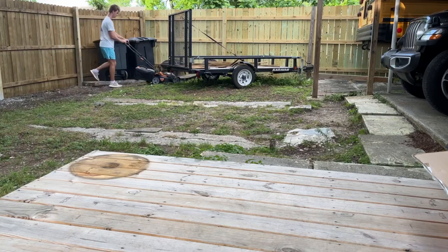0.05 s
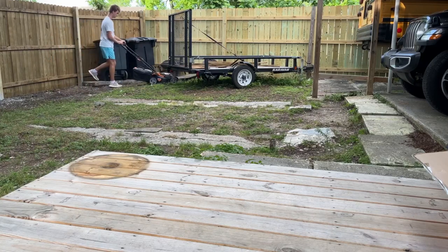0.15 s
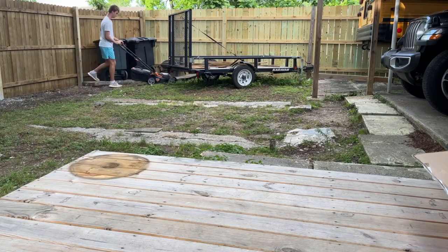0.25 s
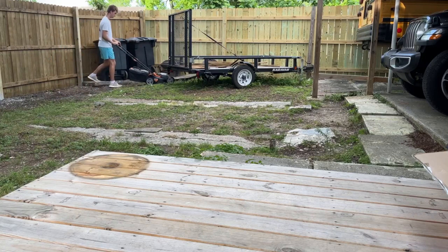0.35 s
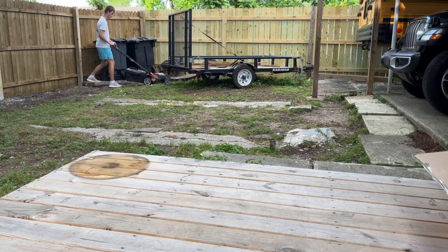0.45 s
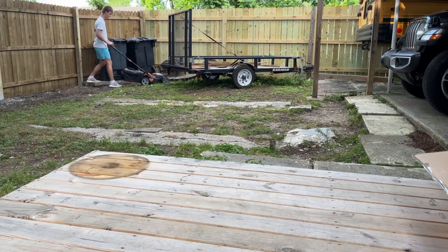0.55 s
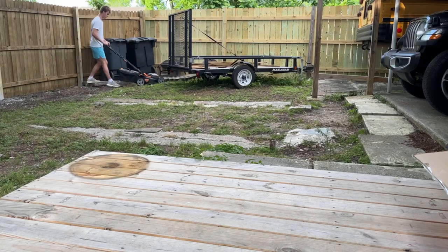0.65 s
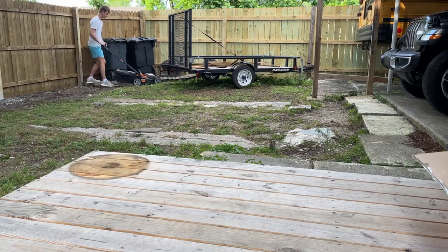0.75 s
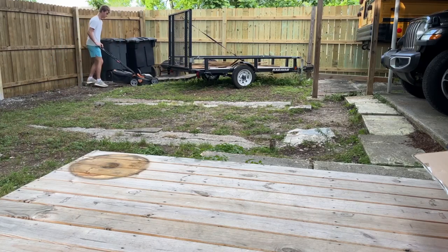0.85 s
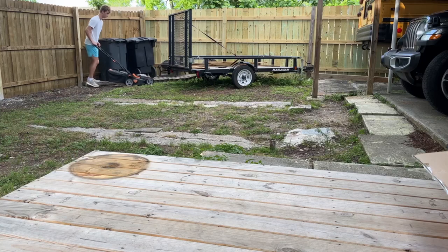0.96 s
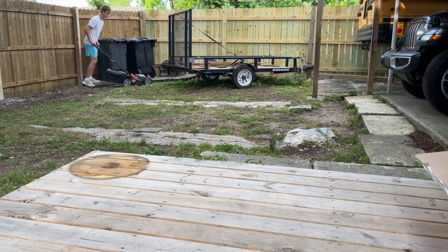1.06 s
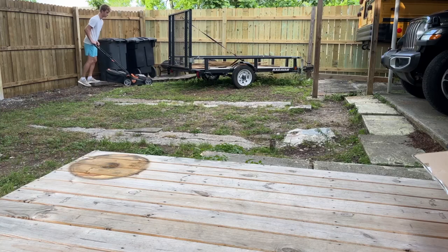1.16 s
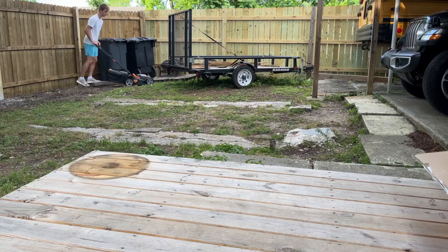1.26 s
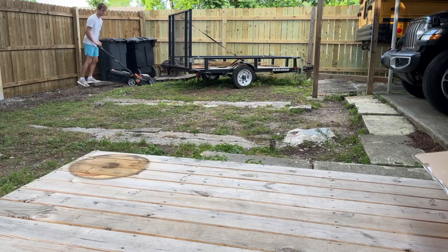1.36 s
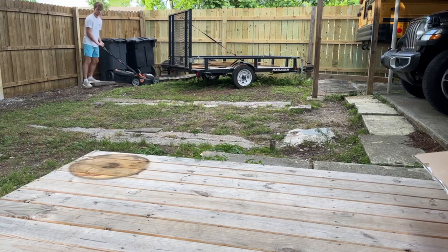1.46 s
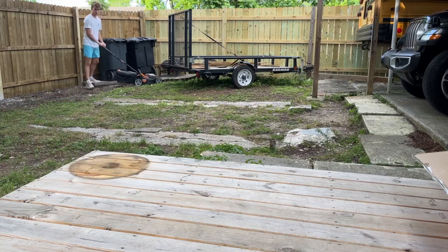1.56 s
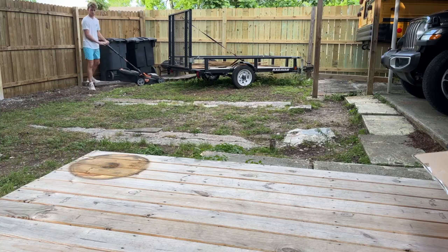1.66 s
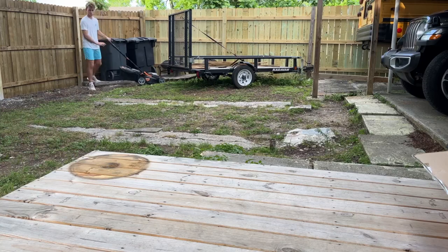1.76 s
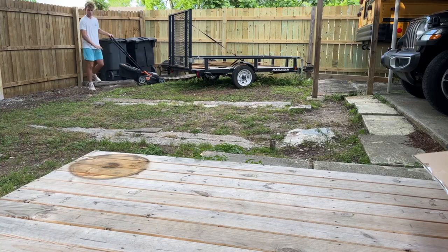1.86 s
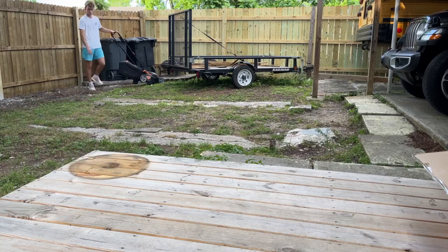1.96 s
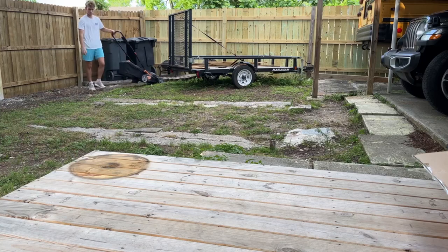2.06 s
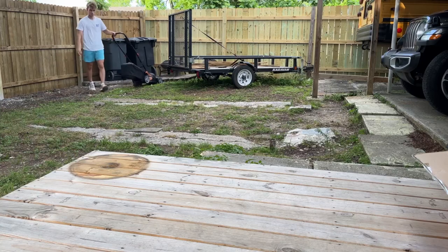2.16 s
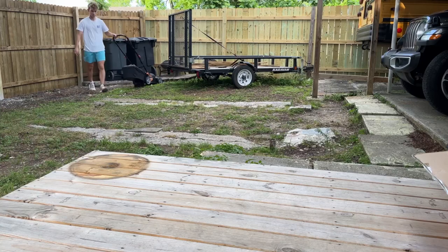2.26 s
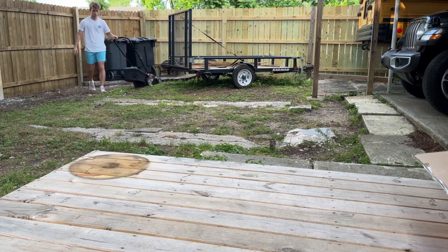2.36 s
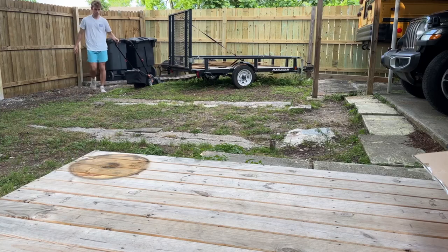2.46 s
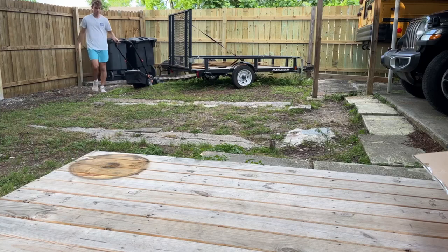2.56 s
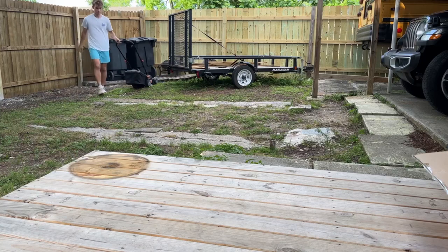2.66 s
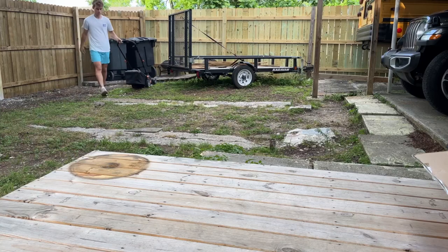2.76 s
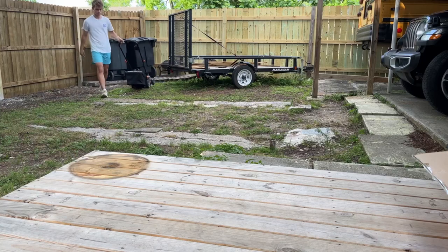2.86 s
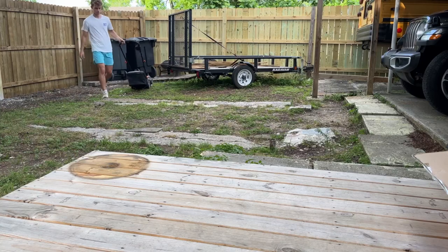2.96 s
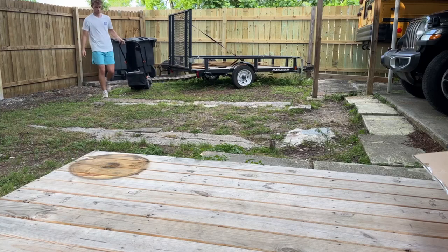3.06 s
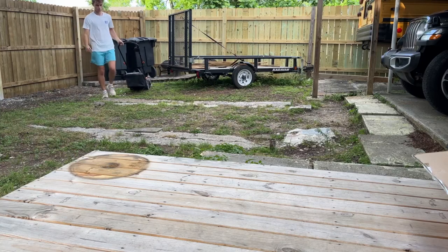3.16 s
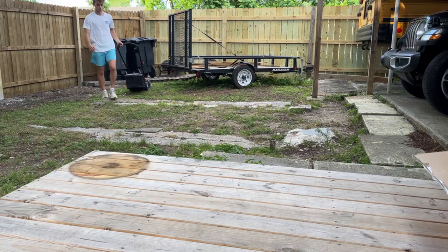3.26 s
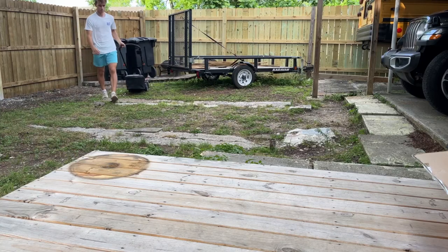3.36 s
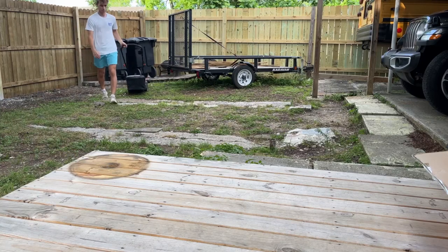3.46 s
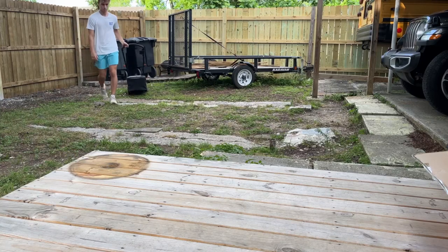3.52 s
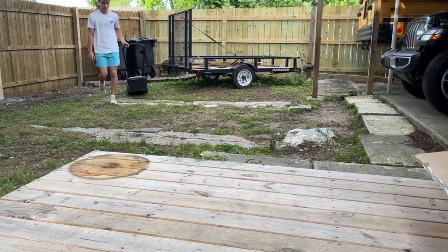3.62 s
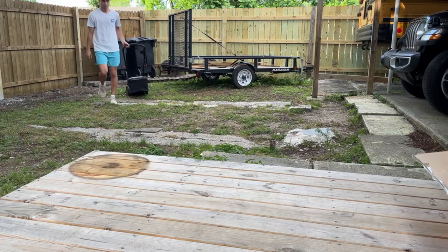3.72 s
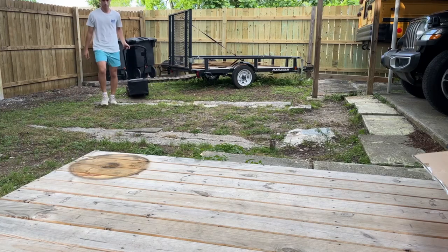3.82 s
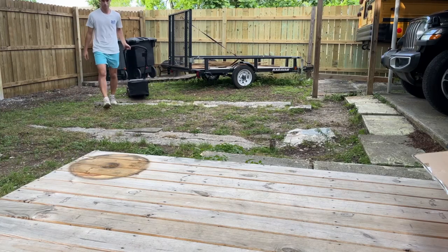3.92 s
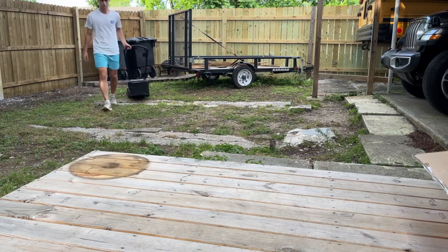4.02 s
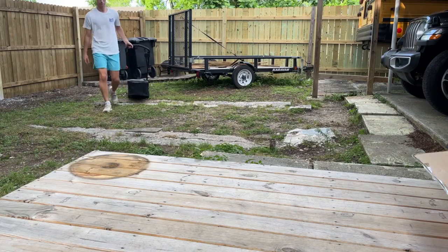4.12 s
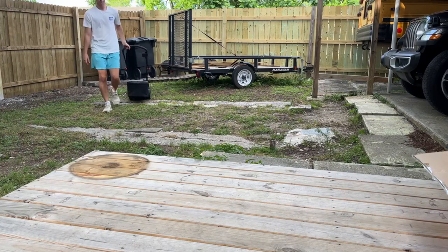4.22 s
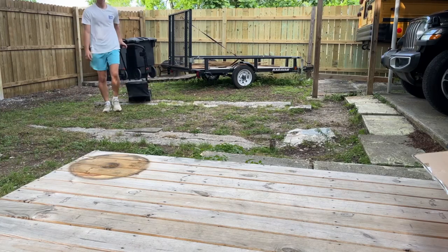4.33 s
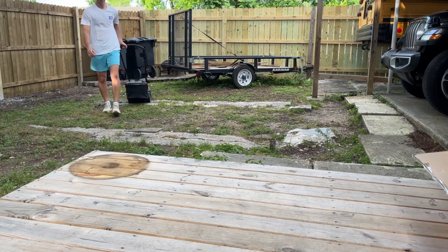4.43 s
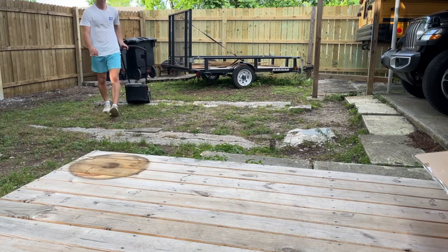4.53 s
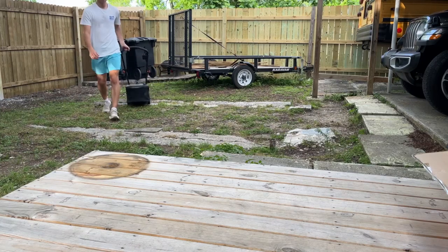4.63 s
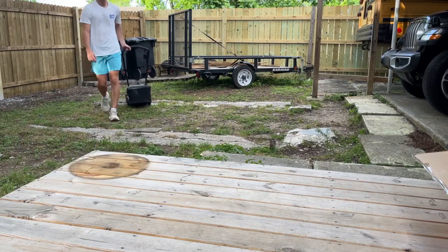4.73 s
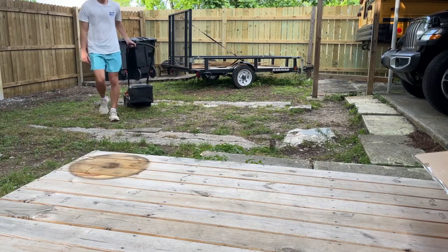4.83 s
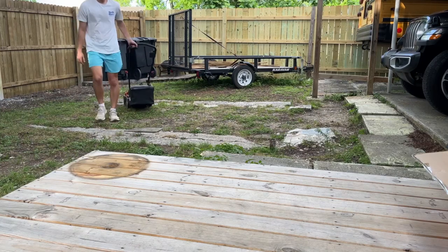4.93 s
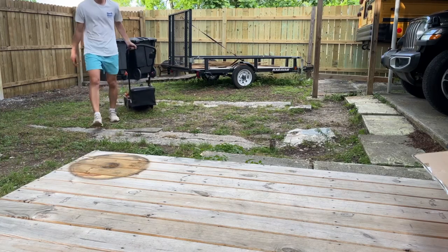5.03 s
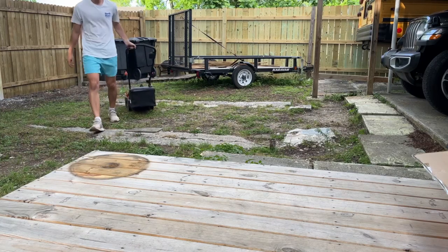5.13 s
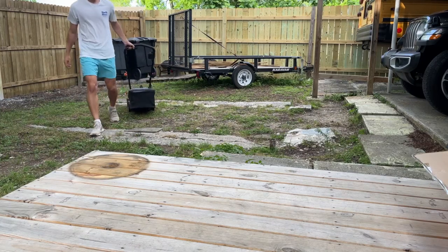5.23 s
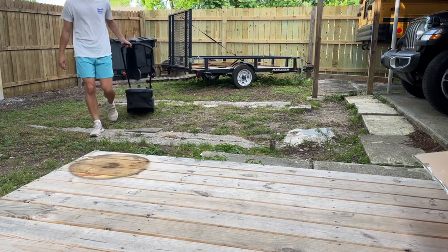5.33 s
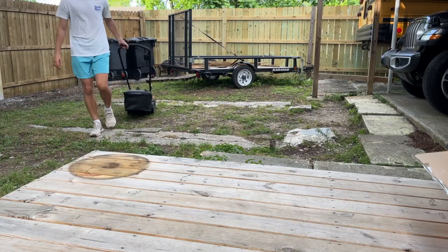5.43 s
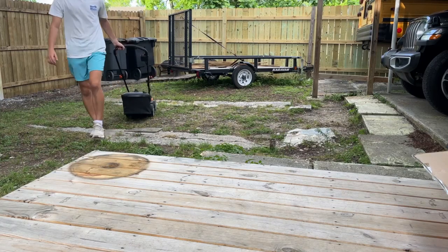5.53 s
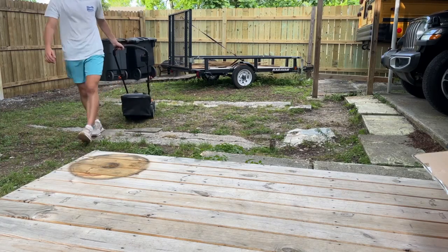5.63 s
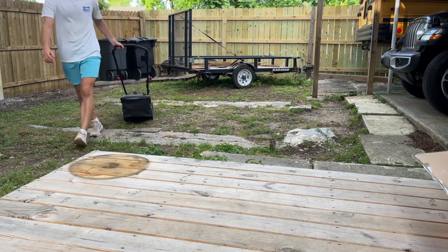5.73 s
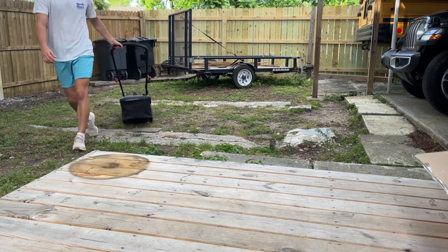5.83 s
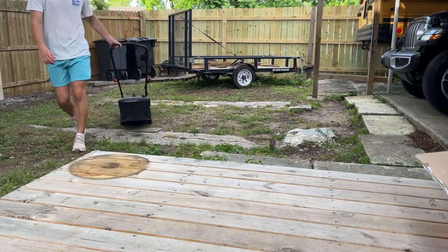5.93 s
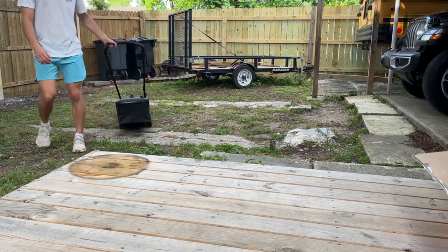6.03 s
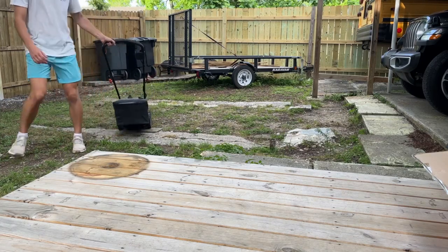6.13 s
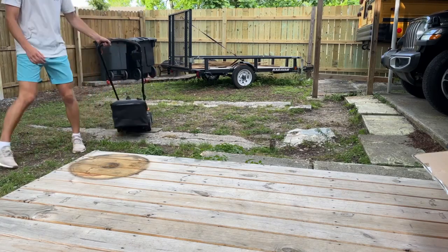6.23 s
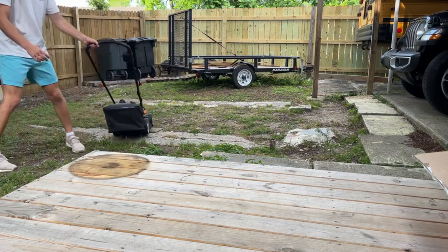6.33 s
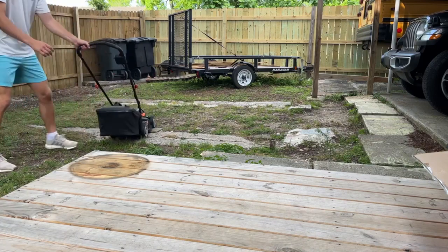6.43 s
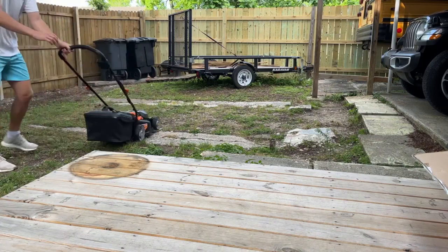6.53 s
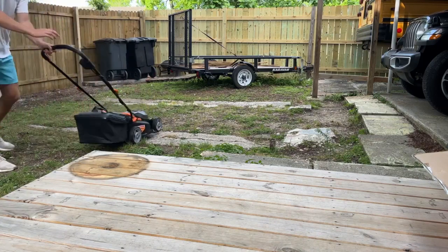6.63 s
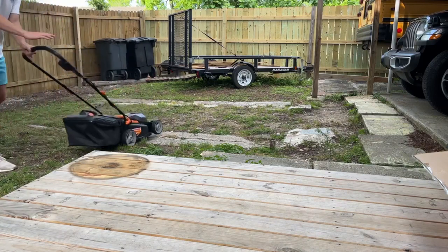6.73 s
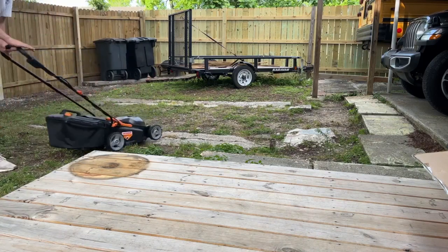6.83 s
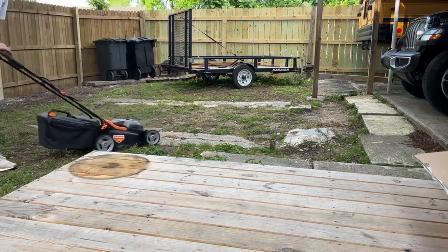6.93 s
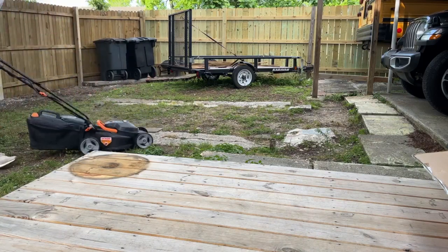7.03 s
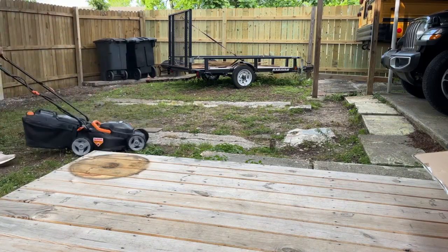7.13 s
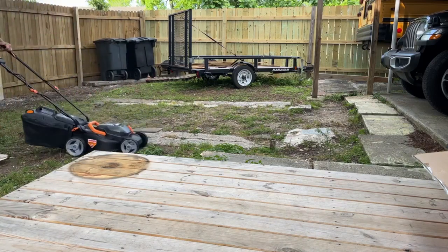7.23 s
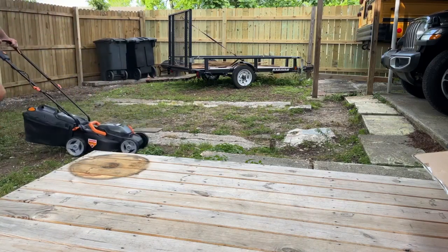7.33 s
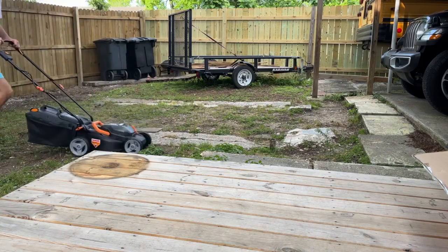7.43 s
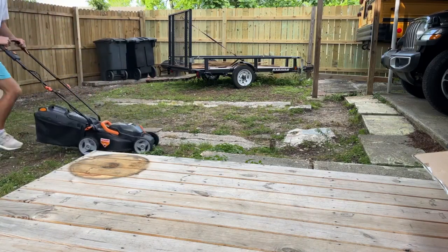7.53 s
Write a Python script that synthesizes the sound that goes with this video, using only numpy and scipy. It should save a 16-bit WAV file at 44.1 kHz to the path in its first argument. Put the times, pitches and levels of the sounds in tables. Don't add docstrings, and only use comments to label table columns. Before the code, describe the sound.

A battery mower is already running at the far end of a fenced yard, heard by a fixed stereo microphone. A steady hum near 270 hertz fades in and out and drifts sideways as echoes cancel it, over a soft low blade throb, hollow roar and papery plastic whir. Around 0.7-0.85 s a cluster of twigs crackles; at 1.6 s a stone rattles sharply against the deck. From 2 to 4 s it is smoother, the hum firmer, with small snaps and grit. From 4.1 s wheels bump over slab edges with hollow thuds, clippings spraying at 4.5 s, the roar rising. A heavy double thump lands at 5.76 s, more at 6.17 s. At 6.49 s comes the loudest hard click and crack, followed by buzzing panels. More knocks and twigs at 7.0-7.3 s, then the close hum continues until the end at 7.6 s.

```python
import sys
import numpy as np
from scipy import signal
from scipy.fft import rfft, irfft, next_fast_len
from scipy.io import wavfile
from scipy.ndimage import uniform_filter1d, map_coordinates

SR = 44100
rng = np.random.default_rng(int(sys.argv[2]) if len(sys.argv) > 2 else 0)


def master(y):
    cut = np.clip(np.atleast_2d(y).T, -1, 1)
    pcm = np.round(cut * 32767)
    wavfile.write(sys.argv[1], SR, pcm.astype(np.int16))


def gain_from_db(level_db):
    decades = np.asarray(level_db, float) / 20
    return 10 ** decades


N = 334278

# t/s, nearness as deck roar level/dB, motor housing turned to the ports level/dB
APPROACH = [(0, -43, -2), (.61, -42.5, -4.5), (1.15, -41, -5), (1.7, -42, -6), (2.05, -38.5, -7.5),
            (2.5, -42, -5), (3.1, -40, -5.5), (3.5, -39.5, -5), (4.1, -37.5, -8), (4.45, -36, -8.5),
            (4.8, -35, -7), (5.2, -36.5, -7.5), (5.4, -33.5, -8), (6.05, -33.5, -5), (6.5, -30.5, -9.5),
            (6.95, -34.5, -4), (7.25, -34, -5), (7.58, -35, -10)]
# t/s, level/dB
FAN_LEVEL = [(0, -35.5), (.25, -44), (.55, -37.5), (.95, -50), (1.4, -42), (1.85, -42.5), (2.2, -30.5),
             (3.63, -32), (4.0, -38), (4.45, -32.5), (4.8, -28.5), (5.17, -30), (5.45, -34), (5.75, -27.5),
             (6.06, -29), (6.45, -24.5), (7.0, -30.5), (7.58, -35)]
# t/s, f/Hz
FAN_PITCH = [(0, 267.5), (1.1, 267.5), (1.35, 270.3), (2, 271.3), (3.65, 271.3), (4.1, 268.8), (4.4, 270),
             (6.05, 270.1), (6.3, 269), (7.2, 267.4), (7.58, 267.6)]
# t/s, half width/s, depth/dB
FAN_FADES = [(.76, 0.025, -1), (1.2, 0.075, 17), (4.59, 0.009, 7.5), (4.67, 0.01, 8), (4.22, 0.062, 8),
             (4.39, 0.042, 7), (5.0, 0.072, 3), (6.19, 0.087, 12), (6.35, .04, 1.5), (6.46, .03, 6),
             (6.51, 0.027, 6), (6.65, 0.034, 5), (7.28, 0.08, 5), (7.43, 0.045, 0)]
# t/s, left-right level/dB
FAN_SIDE = [(0, -0.5), (.19, -7), (.61, -5), (1.01, 14), (1.2, 19), (1.35, 6), (1.9, -8), (2.4, -.5),
            (3.1, -2), (3.57, 1), (4.2, 1), (4.43, -2.5), (5.13, 1), (7.58, -2)]
# multiple of the fan tone, rms level/dB
FAN_ORDERS = [(3 / 5, -61), (4 / 5, -62), (6 / 5, -51), (2, -55.5)]
# t/s, level/dB
BLADE_LEVEL = [(0, -49), (.15, -47.5), (1.65, -44.5), (1.98, -41.5), (2.15, -44), (2.5, -72), (3.1, -65),
               (3.5, -58), (3.71, -50), (4.1, -49), (4.45, -47), (5.1, -49.5), (5.75, -53), (6.38, -48),
               (6.8, -46.5), (7.18, -40), (7.58, -41.5)]
# t/s, half width/s, depth/dB
BLADE_FADES = [
    (4.26, 0.087, 6),
    (4.6, 0.11, 11),
    (4.88, 0.06, 14),
    (5.17, 0.044, 12),
    (5.49, 0.035, 9),
    (5.7, .04, 14),
    (6.52, 0.067, 11),
]
# multiple of blade pass, rms level/dB
BLADE_ORDERS = [(2, -60), (4, -58), (6, -58), (9, -66)]
# f/Hz, level/dB per Hz
ROAR = [(170, -20), (250, -11.5), (290, -1), (368, -4), (474, -6), (621, -6.5), (777, -11), (964, -11),
        (1540, -11.5), (1800, -25.5), (2340, -44), (3960, -120)]
# f/Hz, width/Hz, level/dB
HOLLOW = [(297, 110, -8), (573, 210, -8.5), (860, 240, -9.5)]
# delay/s, added delay/s per dB of nearness, level/dB
FENCES = [(.0075, 0.05, -7)]
# f/Hz, width/Hz, level/dB
HOUSING_MODES = [(1730, 350, 0), (2133, 470, 1), (2580, 510, 0.5), (3320, 300, -11.5)]
# f/Hz, width/Hz, level/dB
PANEL_MODES = [(2158, 210, 0), (2710, 210, 1), (5200, 270, -5)]
# t/s, level/dB
PANEL_LEVEL = [(0, -2.5), (1.0, -2), (1.2, -10), (1.4, -1), (3.2, -7), (3.6, -1), (4.3, -2), (6, -12),
               (6.55, -0.5), (6.9, -7), (7.05, -19), (7.28, -4), (7.58, -2)]
# f/Hz, level/dB per Hz
RUMBLE = [(100, -12.5), (135, -0.5), (170, -3), (215, 9.5), (255, 1.5), (300, -23)]
# f/Hz, level/dB per Hz
YARD = [(12, -50), (30, -28), (54, 10.5), (72, 5), (87, 5.5), (113, 5.5), (130, 5), (170, -54), (290, -120)]
# f/Hz, level/dB per Hz
CLIPPINGS = [(1500, -1.5), (3000, 3), (4200, -2.5), (5100, -4.5), (6200, -6.5), (8000, -6.5),
             (11000, -16.5), (16000, -45)]
# f/Hz, level/dB per Hz
GRIT = [(3000, -12.5), (6000, -3), (8000, -2), (10000, 0), (13000, -2.5), (15500, -3.5), (15900, -10),
        (16400, -40)]
# t/s, half width/s, clippings level/dB, grit level/dB
TUFTS = [(.08, 0.022, -66, -55), (.34, 0.21, -69, -48), (.75, 0.01, -53, -37), (.81, 0.056, -45.5, -45),
         (1.18, 0.088, -50, -61), (1.43, 0.023, -56, -55), (1.63, 0.052, -63, -54), (2.2, 0.032, -46, -66),
         (2.34, 0.013, -47, -68), (2.85, 0.016, -65, -45.5), (2.97, 0.063, -77, -45),
         (3.21, 0.039, -54, -44), (3.38, 0.026, -46, -50), (3.84, 0.26, -54, -50.5),
         (4.18, 0.05, -43.5, -44.5), (4.352, 0.041, -52, -50), (4.53, 0.074, -40.5, -37),
         (4.9, 0.15, -55, -64), (5.25, 0.034, -45, -73), (5.36, 0.045, -61, -52), (5.62, 0.026, -65, -53),
         (5.79, 0.046, -48, -72), (6.39, 0.12, -60, -42), (6.5, 0.024, -45, -40), (6.65, 0.19, -41, -82),
         (7.08, 0.045, -49, -35.5), (7.3, 0.053, -46, -65), (7.58, 0.033, -60, -52)]
# t/s, peak level/dB, dullness/dB
SNAPS = [(0.072, -25.5, -6), (0.6886, -23, 0), (0.7345, -29, 7), (.738, -28, 0), (.743, -29, -6),
         (0.7535, -21, -2), (0.781, -22, -13), (.7875, -18, -11), (0.798, -14, -5), (.803, -19, -8),
         (.8085, -31, -8), (.822, -31, 0), (0.834, -22, 0), (.85, -29, 2), (1.0131, -27, 2),
         (1.1494, -29, -4), (1.4294, -28, -1.5), (2.3286, -26, -13), (2.8537, -25.5, -6),
         (2.9338, -26, -16), (3.2535, -26, -13.5), (3.356, -22.5, -16), (4.171, -22, 6), (4.346, -19.5, -6),
         (4.4822, -21, -9), (4.5294, -34, -1.5), (5.246, -25.5, -1.5), (5.605, -23, -12), (5.7, -25, -4),
         (5.968, -25, 1), (6.349, -38, -1.5), (6.3813, -17, 1), (6.435, -19, -6), (6.489, -13, -4),
         (6.493, -15, -4), (6.504, -23, -3), (6.8673, -22, -17.5), (7.005, -20, -8), (7.053, -14.5, 5.5),
         (7.0641, -15.5, 7), (7.07, -24, -3), (7.085, -27, 0), (7.1, -24, -2), (7.118, -28, -3),
         (7.223, -24, -5)]
# t/s, peak level/dB, t60/s, dullness/dB, crack level/dB
STONES = [
    (1.606, -27, 0.07, -1, -9),
    (1.612, -25, .04, -3, 0),
    (1.6185, -22, 0.05, 0, 3),
    (1.624, -23, .06, 0, 0),
    (6.485, -16, 0.016, -1.5, 0),
]
# f/Hz, level/dB per Hz
KNOCK = [(500, -12), (1200, 9.5), (1800, -2.5), (2800, 1), (3700, -5), (5000, -7), (6500, -12),
         (11000, -20), (16000, -45)]
# t/s, half width/s, f/Hz, rms level/dB
FLARES = [(.757, .004, 4670, -44), (1.159, 0.026, 2500, -59), (1.21, 0.021, 2670, -44),
          (1.26, 0.027, 2640, -42), (2.201, .02, 2420, -43), (1.622, .007, 4920, -37.5),
          (1.619, 0.0054, 2270, -48), (1.617, 0.0067, 1090, -38), (3.69, 0.05, 2690, -43),
          (4.52, .03, 2600, -51), (4.86, 0.022, 2210, -44), (5.88, .03, 2400, -47),
          (6.04, 0.037, 2445, -39), (6.32, 0.022, 2160, -40), (6.492, .012, 1820, -32),
          (6.495, .012, 4970, -40), (6.56, .03, 2300, -41), (6.63, .025, 2400, -41),
          (6.66, .025, 2720, -43), (6.72, .03, 2200, -38), (6.76, .03, 2720, -43), (6.73, .05, 5050, -47),
          (6.835, .02, 2150, -38), (6.9, .035, 2080, -39), (7.0, .04, 2620, -43), (7.056, .008, 1700, -36),
          (7.068, .008, 5200, -44), (7.22, 0.025, 2540, -34.5), (7.28, 0.043, 2270, -36.5),
          (7.28, .04, 5050, -48), (7.57, 0.025, 2240, -41)]
# t/s, half width/s, f/Hz, rms level/dB
HUMS = [(.12, 0.091, 625, -51), (.55, 0.13, 625, -48), (1.05, .08, 323, -43), (1.251, 0.13, 334.3, -46),
        (1.5, 0.14, 329, -39), (2.1, 0.19, 330, -44), (2.3, 0.23, 644, -48), (2.85, 0.11, 536, -45),
        (3.05, 0.15, 530, -47), (3.3, 0.23, 595, -48.5), (3.8, 0.13, 540, -42), (4.0, 0.066, 538, -53),
        (4.35, 0.14, 321, -41), (4.6, 0.12, 565, -40), (4.801, 0.11, 532, -45), (5.3, .1, 537, -52),
        (5.3, .1, 842, -47), (6.57, 0.043, 205, -34), (6.898, 0.12, 219.6, -44), (7.021, .025, 190, -33),
        (7.3, .05, 417, -41), (2.35, .1, 319, -40), (2.7, 0.16, 317, -41), (3.7, 0.044, 317, -38.5),
        (2.15, 0.11, 712, -47), (.2, 0.1, 423, -49), (7.1, 0.082, 537, -42)]
# t/s, peak level/dB
TICKS = [
    (.7808, -24),
    (1.6125, -28),
    (1.6195, -17),
    (6.4843, -7.5),
    (7.004, -26),
    (7.0125, -27),
    (7.0555, -23),
]
# t/s, peak level/dB, brightness/dB
BUMPS = [(0.783, -21.5, 5.5), (.8, -25, 3), (0.829, -29, 8), (1.612, -25, 2), (1.617, -15, -2),
         (2.049, -42, 6.5), (2.359, -18, -19), (4.099, -18.5, 3), (4.105, -18, -2), (4.117, -19, 3),
         (4.27, -26, 6), (4.313, -14, 0), (4.336, -27, 3), (4.573, -13.5, 5), (4.603, -14, -21),
         (4.919, -15, 0), (5.252, -26.5, 14), (5.752, -23, 8), (5.759, -6.5, 0), (5.766, -17, 3),
         (5.776, -18.5, -1), (5.788, -12, -2), (6.121, -20, 11.5), (6.163, -21, 5), (6.172, -13, 0),
         (6.189, -23, 7), (6.303, -22, 5), (6.328, -25, -1), (6.486, -11, -4), (6.54, -12, 0),
         (6.623, -20.5, 9), (7.003, -16, 1), (7.012, -13, -1), (7.027, -19, 1.5), (7.303, -22, 12),
         (7.311, -29, 6), (7.324, -16, -5)]
# f/Hz, width/Hz, level/dB
DECK = [(162, 31, -1.5), (346.6, 42, 7), (544, 96, 2), (924, 154, -2.5), (1380, 380, -15)]
# f/Hz, share 0 to 1
ALIKE = [(60, 0.94), (250, 0.97), (600, 0.49), (1000, 0.16), (1500, 0.31), (1750, 0.91), (1950, 0.89),
         (2800, 0.48), (3800, 0.042), (4600, 0.98), (5300, 0.082), (6500, 0.94), (7600, 0.82),
         (15000, 0.93)]
# f/Hz, phase/rad
LEAD = [(100, 0), (270, -.55), (700, 0), (1000, 0), (1450, 3), (1850, .3), (3500, 1.2), (5000, .5),
        (5500, -1.2), (7000, -1.8), (8350, -3.14), (10000, -4.6), (11900, -6.28), (13500, -7.5),
        (15300, -9.42)]
# f/Hz, left-right level/dB
TILT = [(60, 2.5), (110, -0.5), (200, 1), (380, 0.5), (700, 2.5), (1290, 1), (2380, 1), (4400, 4),
        (8120, 0.5), (15000, -0.5)]

BLADE_HZ = 105.6
SIDE = np.array([[.5], [-.5]])


def unit(x):
    return x / np.sqrt(np.mean(x ** 2) + 1e-20)


def along(points, hz):
    f, v = np.transpose(points)
    return np.interp(np.log(hz + 1), np.log(f + 1), v)


def colour(points):
    return lambda f: gain_from_db(along(points, f))


def curves(rows):
    s, *cols = np.transpose(rows)
    return [np.interp(np.arange(N) / SR, s, c) for c in cols]


def wobble(rate):
    knots = rng.standard_normal(int(N * rate / SR) + 4)
    return map_coordinates(knots, [np.arange(N) * rate / SR])


def filtered(x, response):
    m = next_fast_len(N + SR // 2)
    return irfft(rfft(x, m) * response(np.fft.rfftfreq(m, 1 / SR)), m)[..., :N]


def resonances(modes):
    return lambda f: sum((-1) ** k * gain_from_db(db) * 1j * f * w / (c * c - f * f + 1j * f * w)
                         for k, (c, w, db) in enumerate(modes))


def noise(response, patchy_db, grainy_db):
    z = signal.stft(rng.standard_normal((3, N)), nperseg=512)[2]
    field = uniform_filter1d(rng.standard_normal(z.shape[1:]), 6, 0)
    field = uniform_filter1d(field, 10, 1)
    x = signal.istft(z * gain_from_db(patchy_db * unit(field)), nperseg=512)[1][:, :N]
    return unit(filtered(x * gain_from_db(grainy_db * wobble(400)), response))


def tone(hz, level_db, unsteady):
    phase = 2 * np.pi * np.cumsum(hz * np.ones(N)) / SR + unsteady * wobble(20)
    swing = .7 * wobble(1.5)
    return np.sqrt(2) * gain_from_db(level_db) * np.sin(phase + np.array([[0], [1], [-1]]) * swing)


def bursts(events, rise_s, crack_s, rattle_db, rattle_hz):
    plain, weighted = np.zeros(N + SR), np.zeros(N + SR)
    t = np.arange(SR // 2) / SR
    rattle = np.append(gain_from_db(rattle_db * wobble(rattle_hz)), np.ones(SR))
    for s, db, t60, colour_db, crack_db in events:
        start = round(s * SR)
        tail = gain_from_db(-60 * t / max(t60, .004)) * rattle[start:][:len(t)]
        crack = gain_from_db(crack_db - 60 * t / crack_s)
        shape = gain_from_db(db) * (tail + crack) * (1 - np.exp(-t / rise_s))
        plain[start:][:len(t)] += shape
        weighted[start:][:len(t)] += shape * gain_from_db(colour_db)
    return [train[:N] * rng.standard_normal((3, N)) for train in (plain, weighted)]


def swells(s, width_s, size, tail):
    t = np.arange(0, N, 64)[:, None] / SR
    u = (t - s) / np.where(t > s, tail * width_s, width_s)
    return np.interp(np.arange(N) / SR, t[:, 0], (size * np.exp(-u * u)).sum(axis=1))


def faded(level, fades):
    return curves(level)[0] - swells(*np.transpose(fades), tail=1)


def closer_db():
    return curves(APPROACH)[0] - APPROACH[0][1]


def weak_orders(table, hz):
    orders = sum(tone(k * hz, db + 2.5 * wobble(6), unsteady=.7) for k, db in table)
    return gain_from_db(-0.5 + 0.087 * closer_db()) * orders


def fan_tone():
    level_db = faded(FAN_LEVEL, FAN_FADES) - 1.3 + 0.39 * wobble(25)
    return tone(curves(FAN_PITCH)[0], level_db, unsteady=0.26)


def shaft_orders():
    return weak_orders(FAN_ORDERS, curves(FAN_PITCH)[0])


def blade_tone():
    level_db = faded(BLADE_LEVEL, BLADE_FADES)
    return tone(BLADE_HZ, level_db, unsteady=0.31) + weak_orders(BLADE_ORDERS, BLADE_HZ)


def to_db(gain):
    return 20 * np.log10(gain)


def deck_shake():
    s, db, _ = np.transpose(BUMPS)
    return swells(s, 0.0093, gain_from_db(db), tail=4.6)


def fenced(x):
    t, turn_s = np.arange(N) / SR, 1 / 53.9
    near_db = uniform_filter1d(closer_db(), size=SR // 2)
    x = x + sum(gain_from_db(db - .5 * near_db) * np.roll(x, round(turns * turn_s * SR), axis=1)
                for turns, db in ((1, -10), (2, -18)))
    echoes = sum(gain_from_db(db) * np.array([np.interp(t - s - grows * near_db, t, path) for path in x])
                 for s, grows, db in FENCES)
    return unit(x + echoes)


def deck_roar():
    def hollow(f):
        peaks = sum(1 / (1 + (2 * (f - c) / w) ** 2) * gain_from_db(db) for c, w, db in HOLLOW)
        return .6 + peaks

    roar_db = to_db(gain_from_db(curves(APPROACH)[0]) + gain_from_db(-35.5) * deck_shake())
    air = noise(lambda f: colour(ROAR)(f) * hollow(f), patchy_db=1.5, grainy_db=0.9)
    roar = gain_from_db(roar_db + 2.0 + 0.4 * wobble(9.6)) * fenced(air)
    chatter_db = np.clip(0.11 * (roar_db + 40.0), 0, 3)
    return roar * gain_from_db(chatter_db * wobble(45))


def housing_whir():
    near_db, facing_db = curves(APPROACH)
    whir_db = to_db(gain_from_db(near_db + facing_db) + gain_from_db(-11.5) * tufts()[0])
    body = noise(lambda f: resonances(HOUSING_MODES)(f) ** 2, patchy_db=3.0, grainy_db=2.0)
    panels = noise(lambda f: resonances(PANEL_MODES)(f) ** 2, patchy_db=2.2, grainy_db=2.8)
    whir = gain_from_db(whir_db - 1.5 + 0.33 * wobble(33)) * body
    return whir + gain_from_db(whir_db + curves(PANEL_LEVEL)[0]) * panels


def blade_air():
    throb = 1 + .05 * np.sin(2 * np.pi * BLADE_HZ * np.arange(N) / SR)
    return throb * (deck_roar() + housing_whir())


def wheel_rumble():
    rumble_db = to_db(gain_from_db(-58.5 + 1.89 * closer_db()) + gain_from_db(-42) * deck_shake())
    return gain_from_db(rumble_db - 2.5) * noise(colour(RUMBLE), patchy_db=-0.5, grainy_db=-0.5)


def yard_rumble():
    return gain_from_db(-50.0) * noise(colour(YARD), patchy_db=-1.5, grainy_db=-5.0)


def tufts():
    s, width_s, *levels = np.transpose(TUFTS)
    return [swells(s, width_s, gain_from_db(db), tail=1.36) for db in levels]


def spray():
    tuft_clippings, tuft_grit = tufts()
    clippings = gain_from_db(-48 + 0.33 * closer_db()) + tuft_clippings
    grit = gain_from_db(-55 + 0.51 * closer_db()) + tuft_grit
    clumps = 0.21 * wobble(32) + 0.95 * wobble(60)
    soft = clippings * gain_from_db(0.5 + 1.3 * clumps) * noise(colour(CLIPPINGS), patchy_db=2.0, grainy_db=1.0)
    sharp = grit * gain_from_db(-2 + clumps) * noise(colour(GRIT), patchy_db=3.0, grainy_db=2.0)
    return soft + sharp


def snaps():
    t60_s, crack_db = 0.045, -7
    twigs = [(s, db, t60_s, dull_db, crack_db) for s, db, dull_db in SNAPS]
    crisp, dull = bursts(twigs + STONES, rise_s=0.00026, crack_s=0.007, rattle_db=2.0, rattle_hz=251.4)
    return gain_from_db(-9.0) * filtered(crisp, colour(GRIT)) + gain_from_db(-9.5) * filtered(dull, colour(KNOCK))


def loose_panels():
    out = np.zeros((3, N + SR))
    t = np.arange(-(SR // 4), SR // 4) / SR
    f = np.fft.rfftfreq(len(t), 1 / SR)
    for s, width_s, hz, db in FLARES + HUMS:
        sharpness = 16 if hz > 1000 else 34
        band = resonances([(hz, hz / sharpness, 0)])(f) ** 2
        bell = np.exp(-(t / width_s) ** 2)
        buzz = bell * irfft(rfft(rng.standard_normal((3, len(t)))) * band, len(t))
        level = np.sqrt(np.sum(bell ** 2) / np.sum(buzz ** 2, axis=1, keepdims=True))
        out[:, round(s * SR):][:, :len(t)] += gain_from_db(db) * buzz * level
    return out[:, SR // 4:][:, :N]


def ticks():
    lowest_hz, t60_s = 600, .002
    out, t = np.zeros((3, N)), np.arange(256) / SR
    for s, db in TICKS:
        click = gain_from_db(db - 60 * t / t60_s) * np.sign(rng.standard_normal((3, len(t))))
        out[:, round(s * SR):][:, :len(t)] += click
    return filtered(out, lambda f: (1j * f / (lowest_hz + 1j * f)) ** 2)


def wheel_bumps():
    t60_s, crack_db = 0.044, 2
    blow_db, blow_hz = 6, 900
    events = [(s, db, t60_s, bright_db, crack_db) for s, db, bright_db in BUMPS]
    low, high = bursts(events, rise_s=0.0054, crack_s=0.014, rattle_db=0.5, rattle_hz=91.6)
    s, db, bright_db = np.transpose(BUMPS)
    push = gain_from_db(db + blow_db + np.array([[[0]], [[1]]]) * bright_db)
    blows = np.zeros((2, 3, N))
    blows[:, :, np.round((s + .002) * SR).astype(int)] = push * [[1], [1], [-1]]
    low, high = np.array([low, high]) + filtered(blows, lambda f: 1 / (1 + 1j * f / blow_hz) ** 2)
    return gain_from_db(11.5) * (filtered(low, resonances(DECK[:2])) + filtered(high, resonances(DECK[2:])))


def ports(paths):
    def alike(f):
        return np.clip(along(ALIKE, f), 0, 1)

    direct = filtered(paths[0], lambda f: np.sqrt(alike(f)) * np.exp(1j * SIDE * along(LEAD, f)))
    scattered = filtered(paths[1:], lambda f: np.sqrt(1 - alike(f)))
    return filtered(direct + scattered, lambda f: gain_from_db(SIDE * along(TILT, f)))


def scene():
    fan = ports(fan_tone()) * gain_from_db(SIDE * curves(FAN_SIDE)[0])
    turning = shaft_orders() + blade_tone() + blade_air() + wheel_rumble()
    hits = spray() + snaps() + loose_panels() + ticks() + wheel_bumps()
    return fan + ports(turning + yard_rumble() + hits)


def roll_off(x):
    return signal.sosfilt(signal.butter(12, 16520, fs=SR, output="sos"), x)


def record(dry):
    mix = filtered(dry, lambda f: f < 16500)
    return roll_off(mix)


dry = scene()
out = record(dry)
master(out)
```